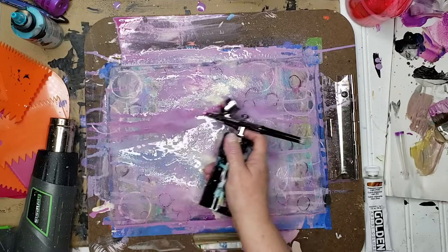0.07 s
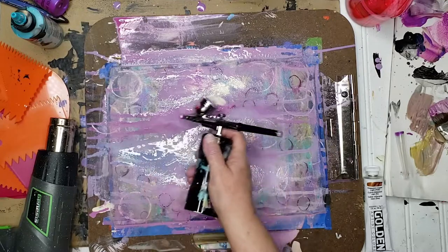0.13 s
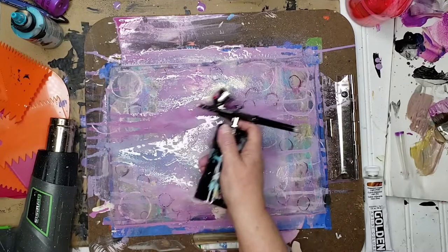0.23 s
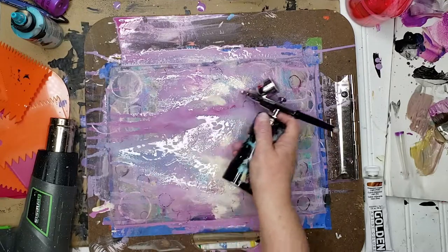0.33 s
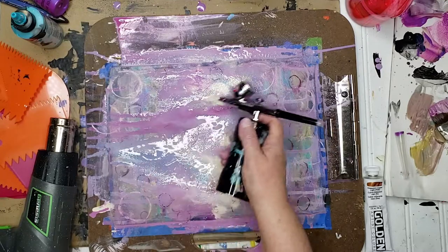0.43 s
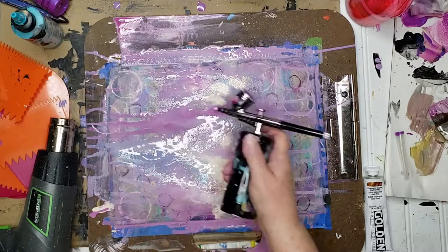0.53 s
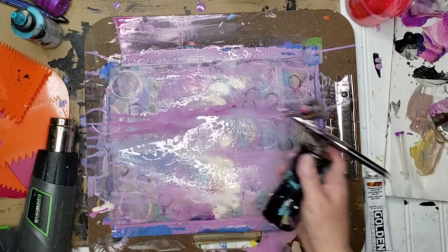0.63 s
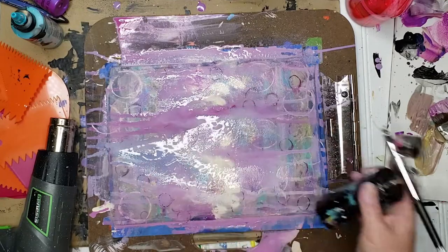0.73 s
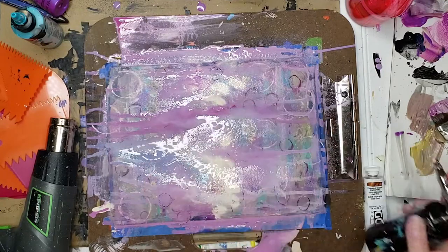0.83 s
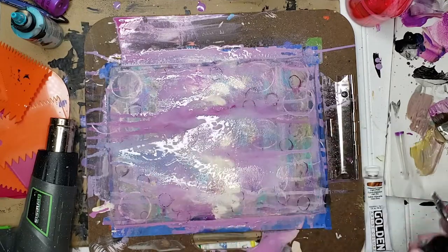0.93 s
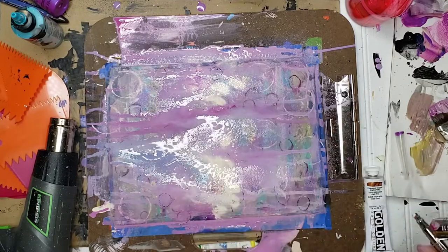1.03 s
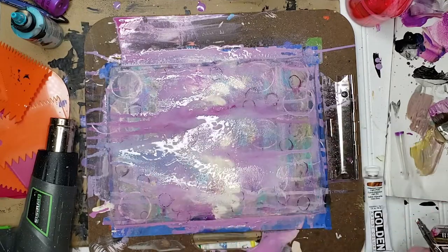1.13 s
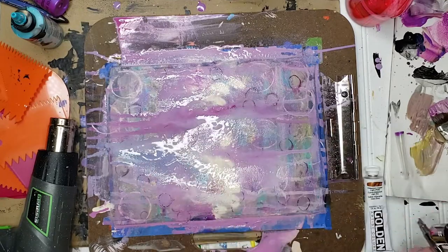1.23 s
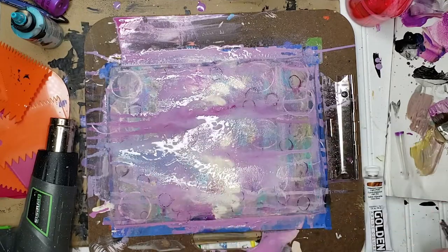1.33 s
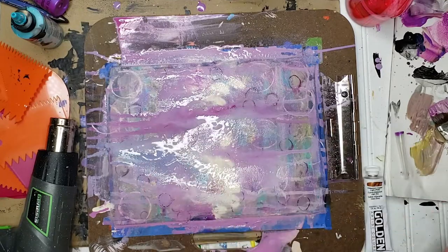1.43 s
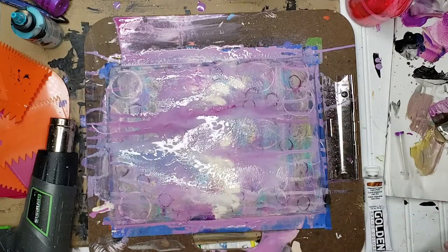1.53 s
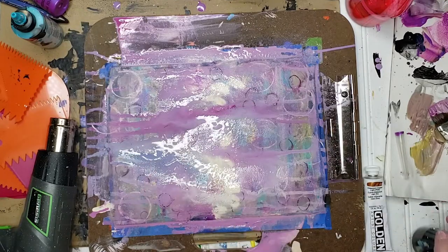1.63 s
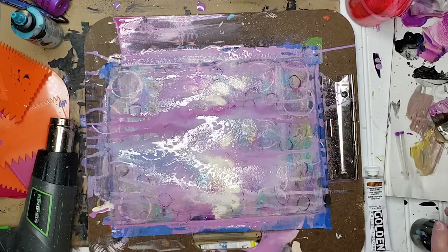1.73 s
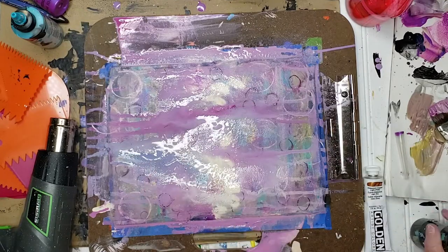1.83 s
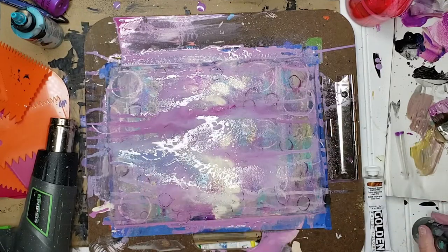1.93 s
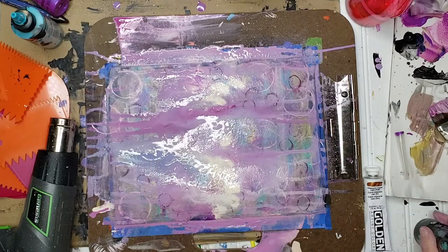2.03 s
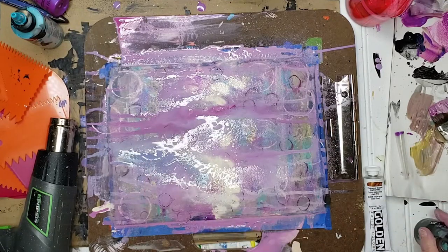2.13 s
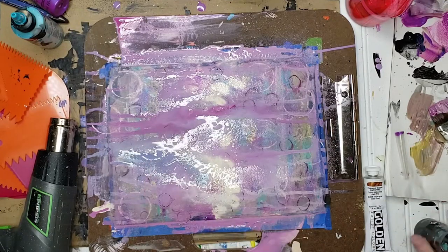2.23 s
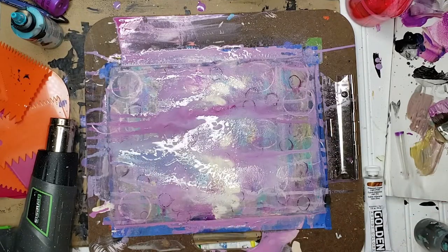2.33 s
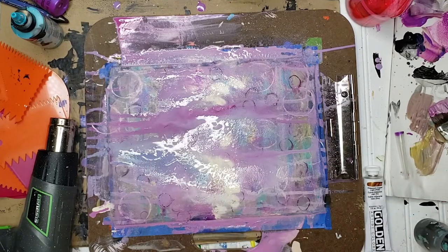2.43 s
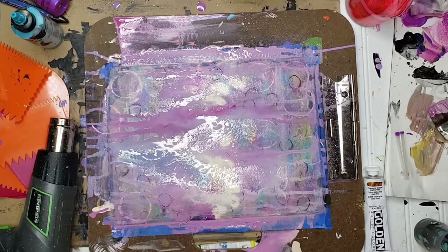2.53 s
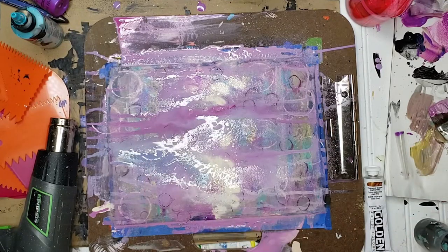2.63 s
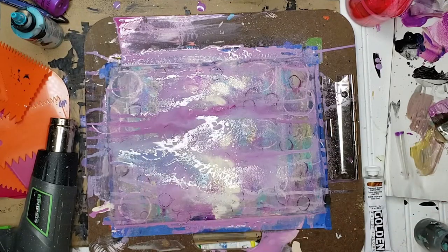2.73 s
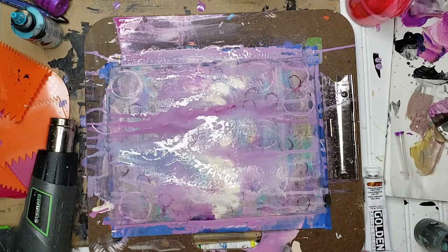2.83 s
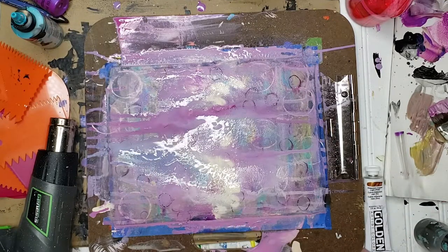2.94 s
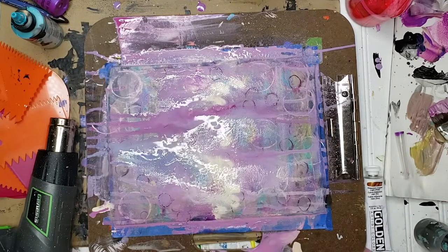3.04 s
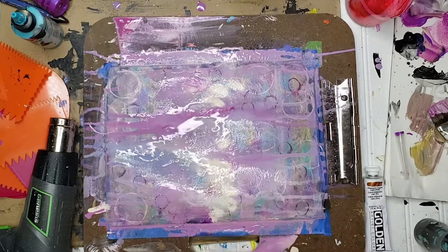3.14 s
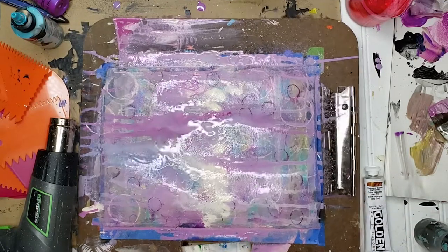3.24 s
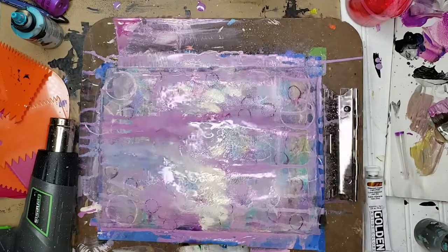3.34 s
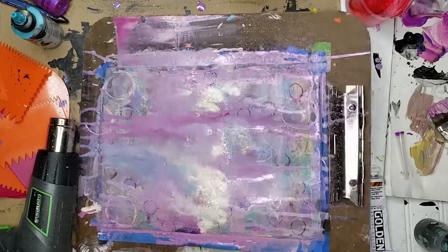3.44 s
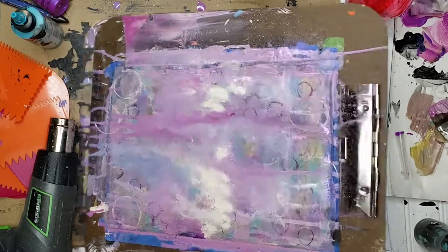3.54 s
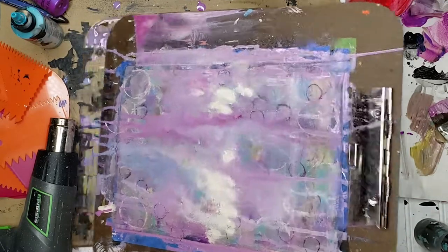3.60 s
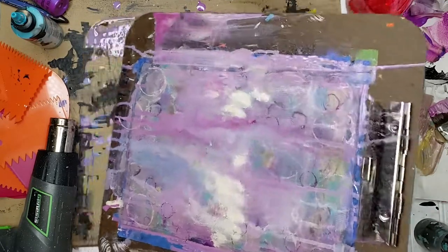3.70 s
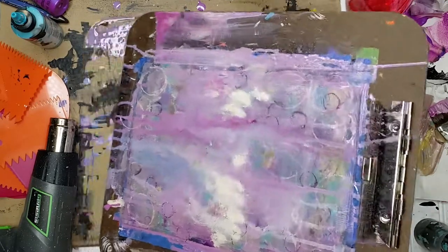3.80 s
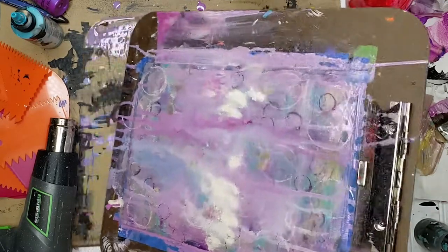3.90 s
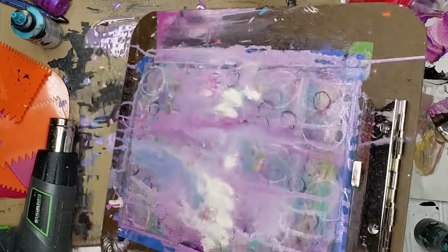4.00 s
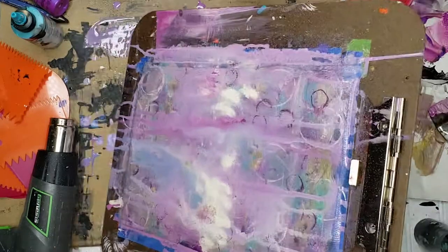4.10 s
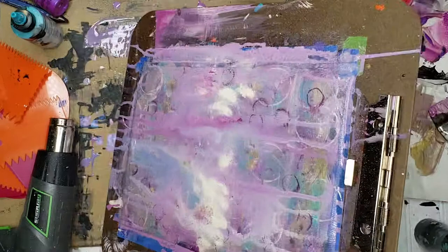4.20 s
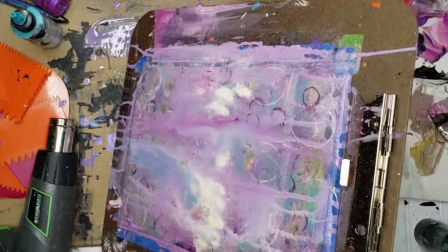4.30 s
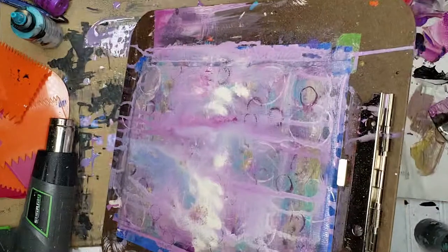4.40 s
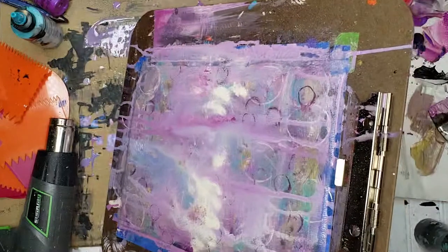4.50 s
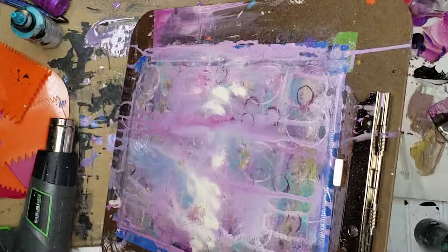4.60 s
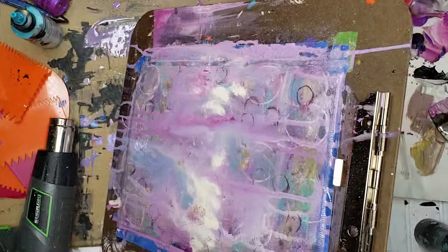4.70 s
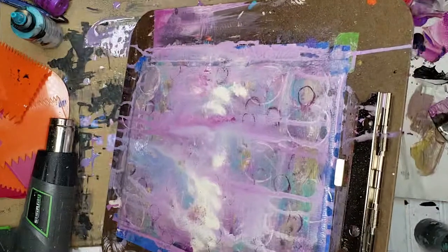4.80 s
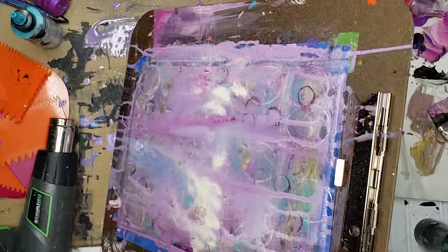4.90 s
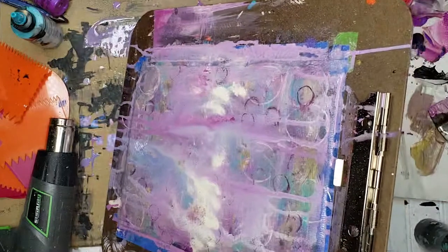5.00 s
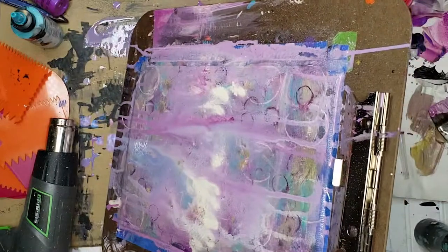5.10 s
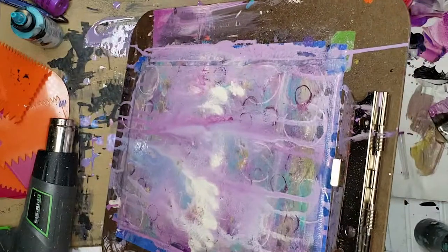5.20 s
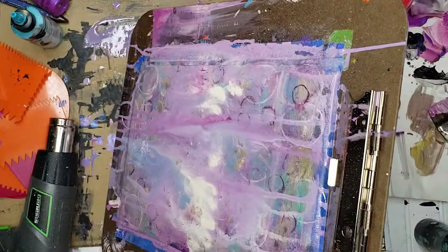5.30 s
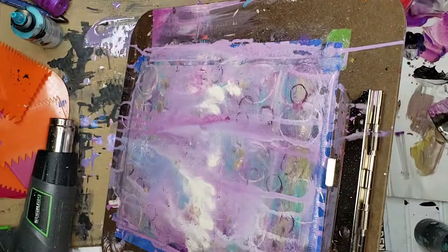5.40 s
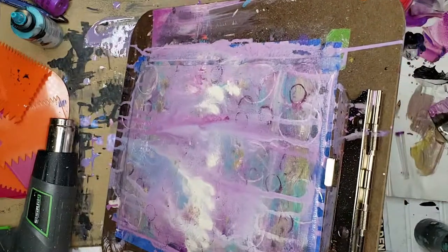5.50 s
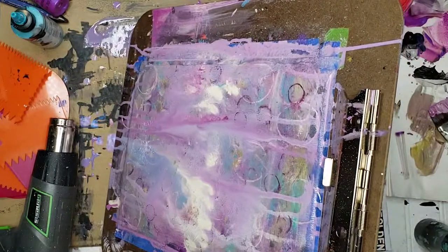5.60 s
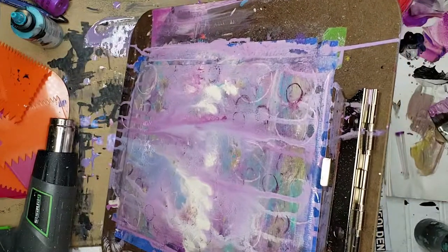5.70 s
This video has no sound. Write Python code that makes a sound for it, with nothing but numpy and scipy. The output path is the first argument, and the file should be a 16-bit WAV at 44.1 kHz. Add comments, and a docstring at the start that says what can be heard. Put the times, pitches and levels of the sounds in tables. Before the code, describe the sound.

A cordless airbrush blows a bright, steady hiss from the start, with the small buzz of its pump underneath. At about 0.7 seconds the air flutters briefly, and the tone shifts as the tool swings aside. Near 1.4 seconds the hiss and buzz stop with a click and a tiny puff, and a switch snaps off sharply just before 1.6 seconds. At about 1.7 seconds the tool lands on the table with a hard knock, then settles with softer bumps. Between 2 and 3.3 seconds a hand brushes faintly over things and small parts tick. A clipboard scrapes briefly across the table around 3.5 seconds, with a faint nudge and tick near 4 seconds and one more tiny tick near the end. Low ventilation rumbles throughout in the small room. The sounds are close and lean to the left.

```python
"""A bright hiss and a small buzz: a cordless airbrush blows over wet paint as its piston pump runs.
It swings aside, the trigger lets go, the valve spits its last air and the switch snaps off.
The tool lands with a hard knock that rings the work table, a hand brushes over things, small parts
tick and a clipboard scrapes across the table. Ventilation rumbles low in the small room throughout,
and the whole scene leans toward the left microphone port."""
import sys
import numpy as np
from scipy import signal
from scipy.fft import rfft, irfft, next_fast_len
from scipy.io import wavfile
from scipy.ndimage import map_coordinates

SR = 44100
rng = np.random.default_rng(int(sys.argv[2]) if len(sys.argv) > 2 else 0)


def transcribe(u):
    """Save the signal u as a 16-bit wav file named by the first command-line argument.

    u: samples, shape (n,) or (channels, n), limited to [-1, 1]; the rate is SR.
    q: integer samples, one column per channel.
    """
    v = np.clip(np.atleast_2d(u).T, -1, 1)
    q = np.round(v * 32767).astype(np.int16)
    wavfile.write(sys.argv[1], SR, q)


N = 253575

# Stereo width of close sounds, then of the room. Each row: frequency in Hz, left-right likeness.
CLOSE_LIKENESS = [(60, 1), (240, 0.27), (950, 0.61), (3770, -0.86), (15000, 0.09)]
ROOM_LIKENESS = [(60, 1), (220, 1), (400, 0.52), (730, 0.58), (1100, 0.016), (15000, .02)]
# The room's tail. Each row: frequency in Hz, time to fall 60 dB in seconds.
ROOM_DECAY = [(100, 0.22), (600, 0.23), (2000, 0.22), (7000, 0.23), (15000, 0.12)]
# Colour of the hiss over the paper, then turned aside. Each row: frequency in Hz, relative level in dB.
HISS_OVER_PAPER = [(1350, -63), (2300, -41.5), (2390, -22.5), (3100, -27.5), (3470, -24), (4560, -20.5),
                   (4870, -14), (5720, -14.5), (6560, -9), (9430, -7), (11600, 0), (12500, -2), (15200, 4),
                   (15800, -10)]
HISS_ASIDE = [(1350, -69.5), (2300, -35), (2880, -25), (2980, -33.5), (3120, -18), (3550, -24),
              (4080, -20.5), (4530, -44), (4870, -15), (5450, -15.5), (9430, -10), (12000, 0),
              (13100, -2.5), (15200, 6.5), (15800, -4)]
# The tool's body shades the right port. Each row: frequency in Hz, left over right in dB.
BODY_SHADE = [(2300, -5), (3500, 13), (4900, -0.5), (6000, 8.5), (9000, -1.5), (15000, -1)]
# Reflections off table, arm and jars. Each row: lag in seconds, gain.
NEAR_REFLECTIONS = [(.00062, .25), (.0023, .3), (.0052, .3)]
# Pump overtones over the paper, then turned aside. Each row: frequency in Hz, relative level in dB.
BUZZ_OVER_PAPER = [(310, -56), (540, -58), (700, -64.5), (850, -63.5), (1080, -80), (1250, -83),
                   (1545, -64.5), (1700, -57.5), (1780, -63), (1930, -60), (2200, -86.5), (3500, -76)]
BUZZ_ASIDE = [(310, -50), (540, -73), (700, -61.5), (850, -75.5), (926, -54), (1000, -68.5), (1235, -70.5),
              (1313, -62), (1400, -76.5), (1750, -87.5), (2400, -86), (2930, -93), (3090, -63.5),
              (3600, -140)]
# Where pump, room tone and table sit in stereo. Each row: frequency in Hz, left over right in dB.
PUMP_BALANCE = [(300, 4), (600, 12), (950, 13), (1700, 20.5), (3100, 11)]
ROOM_BALANCE = [(60, 11), (220, 5.5), (900, 8), (2500, 4.5), (15000, 0.5)]
TABLE_BALANCE = [(130, 5.5), (500, 6), (1100, 9.5), (2000, 11), (5000, 13.5), (14000, 2)]
# Noise colours. Each row: frequency in Hz, relative level in dB.
RUMBLE_COLOUR = [(15, -56.5), (25, -17), (58, -17.5), (139, -0.5), (195, -16), (236, -3.5), (345, -13.5),
                 (380, -13), (408, -26), (482, -19), (598, -33), (741, -27.5), (875, -33), (7500, -61.5),
                 (9750, -94), (16500, -120)]  # ventilation
MIC_COLOUR = [(3000, -6), (8500, -11), (10000, -6), (12000, -0.5), (15600, 0.5), (16000, -14.5)]  # the microphone's own hiss
SPUTTER_COLOUR = [(300, -18), (600, 4.5), (1100, -9.5), (1600, 2), (2050, 3), (2500, -8.5), (4000, -13),
                  (7000, -12)]  # air on the board's edge
CLICK_COLOUR = [(2000, 2.5), (3200, -6.5), (4800, -14), (6400, -1.5), (7600, -4.5), (8800, -9), (11000, 1),
                (15000, -0.5)]  # small hard parts
CRACK_COLOUR = [(60, -21), (150, 1.5), (350, -0.5), (700, -4), (1200, -7), (2000, -12), (2600, -17.5),
                (4500, -26.5), (7300, -25.5), (8600, -32.5), (15800, -24)]  # the attack of a knock
SKIN_COLOUR = [(2000, -21), (4300, -13), (5300, -5.5), (7400, 1.5), (8500, -9), (11000, 0), (14000, -0.5),
               (15800, 2.5)]  # a brushing hand
SCRAPE_COLOUR = [(90, 1), (150, -7), (280, -14), (400, -1.5), (560, -12), (720, -16.5), (1100, -15.5),
                 (1500, -35), (1900, -15), (2400, -19.5), (3200, -20.5), (4500, -23.5), (7200, -17),
                 (8400, -21.5), (15500, -23.5)]  # sliding hardboard
# Resonances that colour noise. Each row: centre in Hz, width in Hz, relative level in dB.
DUCT_MODES = [(65, 12.5, 1.5), (116.5, 5.1, -4), (135.1, 12.3, -4.5), (165.6, 16, -1), (230.3, 27, -1),
              (292.6, 22, -4.5), (313, 23.4, -0.5), (379.7, 6.5, -5), (472.7, 66, -14.5), (536, 29, -14),
              (727.1, 7.1, -10)]  # ventilation duct
VALVE_MODES = [(3300, 750, -1), (4260, 500, -1), (6450, 480, -4.5), (7100, 460, -7)]  # air valve
METAL_MODES = [(2370, 130, 3), (2900, 93, -0.5), (3730, 490, -1.5), (4480, 360, -3.5)]  # small metal parts
HARDBOARD_MODES = [(719, 34, 5), (1260, 41, -2), (1543, 79, 1), (2300, 96, 1.5), (2810, 230, -1),
                   (3257, 23, -2.5), (3590, 30, -11)]  # the clipboard's panel
STEEL_MODES = [(1340, 160, 5), (1820, 160, -1), (2280, 130, 0), (2780, 260, -13), (3350, 300, -17)]  # its steel clip
# The trigger, then the switch. Each row: start in seconds, snap level in dB, snap low cut in Hz,
# ring level in dB, ring low cut in Hz, the snap's left over right in dB.
CONTROL_SNAPS = [(1.3820, -9, 4540, -41, 3600, 6), (1.5600, 1, 12160, -18, 5260, 6)]
# Blows on the table. Each row: start in seconds, ring level in dB, crack level in dB,
# high cut in Hz, attack in seconds.
TABLE_BLOWS = [(1.7314, -11, -4.5, 9350, 0.00091), (1.7357, -23, -8, 9100, 0.00026),
               (1.7401, -9.5, -12.5, 9100, 0.00055), (1.753, -31.5, -27, 5000, 0.00048),
               (1.982, -34, -30, 710, .0015), (1.99, -23, -27, 503, 0.00067), (2.008, -34, -32, 600, .003),
               (2.032, -35, -27, 560, 0.005), (2.266, -42, -31.5, 1890, 0.0041),
               (2.31, -35, -33, 1580, 0.0045), (2.708, -35, -37, 660, 0.0007)]
# The table's ring. Each row: frequency in Hz, relative level in dB, time to fall 60 dB in seconds.
TABLE_MODES = [(54.4, -10, 0.24), (140.3, 7.5, 0.079), (170, -5, 0.09), (219.6, -5.5, 0.13),
               (334, -1, 0.11), (387, 0, 0.045), (486, -22, 0.048), (511, -14, 0.069), (530, -11, .07),
               (746, -6.5, 0.15), (860, -24, 0.052), (1031, -20, 0.065), (1070, -27, .06),
               (1230, -15.5, 0.072), (1360, -18.5, .08), (1570, -20.5, 0.16), (1820, -14, 0.13),
               (1940, -16.5, 0.14), (2440, -36, .09)]
# Hand strokes. Each row: peak time in seconds, level in dB, rise in dB per second, tilt in dB per octave.
HAND_STROKES = [(1.95, -38.5, 114, 0), (2.282, -47.5, 151, -1.5), (3.244, -45.5, 78, 2.5)]
# Handling ticks. Each row: start in seconds, level in dB, high cut in Hz, time to fall 60 dB in seconds.
HANDLING_TICKS = [(2.268, -36.5, 6000, 0.042), (2.706, -38.5, 8000, 0.029), (2.802, -36.5, 10100, 0.086),
                  (2.823, -39.5, 10100, .08), (2.946, -42.5, 5900, 0.025), (3.021, -36, 13800, 0.017),
                  (3.059, -32, 7000, 0.025), (3.109, -37.5, 10000, 0.025), (3.768, -47, 7000, .02),
                  (4.019, -40, 14000, 0.01), (5.367, -48.5, 11000, 0.016)]
# The clipboard is gripped, dragged and nudged straight. Each row: start in seconds, hold in seconds,
# board level in dB, steel level in dB.
CLIPBOARD_MOVES = [(3.054, 0.28, -65, -65.5), (3.546, 0.18, -36, -51.5), (3.887, 0.094, -61, -60.5)]


def amp(db):
    """Decibels to gain."""
    return 10 ** (np.asarray(db) / 20)


def unit(x):
    """x at rms 1."""
    return x / np.sqrt(np.mean(x ** 2) + 1e-20)


def along(points, hz):
    """(Hz, value) points read on a log axis."""
    freqs, values = np.transpose(points)
    return np.interp(np.log(hz + 1), np.log(freqs + 1), values)


def wobble(rate):
    """A smooth random curve, rate knots a second."""
    return map_coordinates(rng.standard_normal(int(N * rate / SR) + 4), [np.arange(N) * rate / SR])


def swell(s, hold, rise, fall):
    """An envelope that reaches 1 at time s, holds, then dies; rise and fall are in dB per second."""
    t = np.arange(N) / SR
    return amp(-rise * np.maximum(s - t, 0) - fall * np.maximum(t - s - hold, 0))


def filtered(x, response):
    """x through a frequency response."""
    n = x.shape[-1]
    padded = next_fast_len(n + 8192)
    return irfft(rfft(x, padded) * response(np.fft.rfftfreq(padded, 1 / SR)), padded)[..., :n]


def shape(spectrum):
    """An EQ curve through (Hz, dB) points, rolling off below the first."""
    return lambda hz: amp(along(spectrum, hz)) * np.minimum(hz / spectrum[0][0], 1) ** 2


def resonances(modes):
    """An EQ curve of (Hz, width Hz, dB) peaks."""
    return lambda hz: np.sqrt(sum(amp(db) ** 2 / (1 + (2 * (hz - centre) / width) ** 2) ** 2
                                  for centre, width, db in modes))


def sides(pan_db):
    """Left and right gains for a level difference."""
    gains = amp(np.array([[.5], [-.5]]) * pan_db)
    return gains / gains.mean(axis=0)


def rush(colour, likeness=CLOSE_LIKENESS):
    """Coloured stereo noise with its mid at rms 1; less likeness makes it wider."""
    def mid_side(hz):
        angle = np.arccos(np.clip(along(likeness, hz), 0, 1)) / 2
        return colour(hz) * np.array([np.cos(angle), np.sin(angle)])
    mid, side = filtered(rng.standard_normal((2, N)), mid_side)
    return np.array([mid + side, mid - side]) / mid.std()


def add(track, s, sound):
    """Mix a sound into a track at time s."""
    part = track[..., round(s * SR):][..., :sound.shape[-1]]
    part += sound[..., :part.shape[-1]]


def swing(middle_s=0.91, length_s=0.74, before=0.19, after=0.9):
    """How far the tool is turned aside (0-1): one smooth move of the hand."""
    done = .5 + .5 * np.tanh(4 * (np.arange(N) / SR - middle_s) / length_s)
    return before + (after - before) * done


def jet(level_db=-33, aside_boost_db=2.1, flutter_db=.6, shut_s=1.36, fade_t60=0.24):
    """Air hisses from the nozzle, coloured by its aim; near echoes comb the hiss as the tool moves."""
    t, aside = np.arange(N) / SR, swing()
    air = np.sqrt(1 - aside) * rush(shape(HISS_OVER_PAPER)) + np.sqrt(aside) * rush(shape(HISS_ASIDE))
    air = filtered(air, lambda hz: sides(along(BODY_SHADE, hz)))
    echoes = np.zeros((2, N))
    for port in range(2):
        for lag, gain in NEAR_REFLECTIONS:
            sway_s = .00018 * aside + .00002 * wobble(3.6)
            echoes[port] += gain * np.interp(t - lag - sway_s, t, air[port])
    valve = swell(0, shut_s, rise=0, fall=60 / fade_t60)
    level = amp(level_db + aside_boost_db * aside + flutter_db * wobble(19.6))
    return (air + echoes) * valve * level * sides(pan_db=1.4 + 4 * aside)


def pump(stroke_hz=77.22, level_db=2, rough_db=-6, stop_s=1.357):
    """Piston strokes give overtones and puffs of noise; turning the tool changes which ones carry."""
    t, aside = np.arange(N) / SR, swing()
    dip_db = 5 * np.exp(-((t - 0.666) / 0.057) ** 2)  # the buzz dips briefly as the swing begins
    level = amp(level_db - dip_db) * swell(0, stop_s, rise=0, fall=226)
    phase = 2 * np.pi * np.cumsum(stroke_hz * (1 + 0.0011 * wobble(9.55))) / SR
    buzz = np.zeros(N)
    for k in range(4, 47):
        over = amp(along(BUZZ_OVER_PAPER, k * stroke_hz))
        turned = amp(along(BUZZ_ASIDE, k * stroke_hz))
        overtone = np.sqrt(2) * np.sin(k * phase + rng.uniform(0, 2 * np.pi))
        buzz += (over + (turned - over) * aside) * overtone
    breath = sum(share * rush(shape(tones)) * np.linalg.norm(amp(np.array(tones)[:, 1]))
                 for share, tones in [(1 - aside, BUZZ_OVER_PAPER), (aside, BUZZ_ASIDE)])
    puffs = amp(rough_db) * breath * (1 + np.cos(phase))
    return filtered(level * (buzz + puffs), lambda hz: sides(along(PUMP_BALANCE, hz)))


def ventilation(rumble_db=-40, duct_db=-42, waver_db=1.7, hiss_db=-67):
    """A bed of low rumble and wavering duct resonances, with the microphone's faint hiss on top."""
    rumble = amp(rumble_db) * rush(shape(RUMBLE_COLOUR), ROOM_LIKENESS)
    duct = amp(duct_db + waver_db * wobble(5.29)) * rush(resonances(DUCT_MODES), ROOM_LIKENESS)
    hiss = amp(hiss_db) * rush(shape(MIC_COLOUR), ROOM_LIKENESS)
    return filtered(rumble + duct + hiss, lambda hz: sides(along(ROOM_BALANCE, hz)))


def sputter(start_s=0.6825, level_db=-38.5):
    """A short flutter as the jet sweeps over the board's edge."""
    level = amp(level_db + 2.2 * wobble(88.3)) * swell(start_s, hold=0.032, rise=919, fall=265)
    return level * rush(shape(SPUTTER_COLOUR)) * sides(pan_db=9)


def valve_puff(level_db=-38):
    """Trapped air rings the valve as it closes."""
    release_s = CONTROL_SNAPS[0][0]
    level = amp(level_db) * swell(release_s, hold=0, rise=5000, fall=338)
    return level * rush(resonances(VALVE_MODES)) * sides(pan_db=10)


def click(low_hz, bright_hz, t60, wet_db=-5):
    """A small hard part gives a dying burst of noise and lights up the room."""
    def band(hz):
        low_cut = (hz / low_hz) ** 4 / np.hypot(1, (hz / low_hz) ** 4)
        return amp(along(CLICK_COLOUR, hz)) * low_cut / np.hypot(1, (hz / bright_hz) ** 3)
    t = np.arange(SR // 2) / SR
    snap = rng.standard_normal((2, len(t))) * amp(-60 * t / t60)
    return filtered(snap + amp(wet_db) * np.linalg.norm(snap[0]) * room_tail(), band)


def room_tail(build_s=0.006):
    """The walls answer a click with a short tail, centred in the bass and wide in the treble."""
    n = SR // 2
    hz, t, noise = signal.stft(rng.standard_normal((2, n)), SR, nperseg=256)
    alike = np.clip(along(ROOM_LIKENESS, hz), 0, 1)[:, None]
    noise[1] = alike * noise[0] + np.sqrt(1 - alike ** 2) * noise[1]
    decay = amp(-60 * t / along(ROOM_DECAY, hz)[:, None])
    tail = signal.istft(noise * decay, SR, nperseg=256)[1][:, :n]
    tail *= 1 - np.exp(-np.arange(n) / SR / build_s)
    return tail / np.linalg.norm(tail[0])


def trigger_and_switch():
    """The trigger springs back, then the switch snaps off; each rings on briefly."""
    out = np.zeros((2, N))
    for s, snap_db, snap_hz, ring_db, ring_hz, pan_db in CONTROL_SNAPS:
        add(out, s, amp(snap_db) * click(snap_hz, bright_hz=17900, t60=0.011) * sides(pan_db))
        add(out, s, amp(ring_db) * click(ring_hz, bright_hz=7100, t60=.14))
    return out


def knocks(crack_t60=0.11, wet_db=-11):
    """The tool's base lands, rocks and settles; softer contacts ring mostly the table's low modes."""
    out, t = np.zeros((2, N)), np.arange(SR // 2) / SR
    for s, ring_db, crack_db, bright_hz, attack_s in TABLE_BLOWS:
        contact = lambda hz: 1 / np.hypot(1, (hz / bright_hz) ** 2)
        ring = np.zeros(len(t))
        for k, (hz, db, t60) in enumerate(TABLE_MODES):
            decay = amp(db + rng.normal(0, 1) - 60 * t / t60)
            ring += (-1) ** k * contact(hz) * decay * np.sin(2 * np.pi * hz * t)
        crack = filtered(rng.standard_normal(len(t)), lambda hz: shape(CRACK_COLOUR)(hz) * contact(hz))
        blow = amp(ring_db) * ring + amp(crack_db - 60 * t / crack_t60) * unit(crack)
        blow *= 1 - np.exp(-t / attack_s)
        add(out, s, blow)
        add(out, s, amp(wet_db) * signal.fftconvolve(blow[None], room_tail(), axes=1))
    return filtered(out, table_to_ports)


def table_to_ports(hz, lead_s=0.000196):
    """Sound from the table reaches the left port louder and earlier."""
    return sides(along(TABLE_BALANCE, hz)) * np.exp(1j * np.pi * hz * lead_s * np.array([[1], [-1]]))


def hand():
    """Skin whispers over tool and paper, swelling as it speeds up and dying as it lifts off."""
    strokes = np.zeros((2, N))
    for s, db, rise, tilt_db in HAND_STROKES:
        skin = rush(lambda hz: shape(SKIN_COLOUR)(hz) * amp(tilt_db * np.log2(1 + hz)))
        strokes += amp(db) * swell(s, hold=0, rise=rise, fall=191) * skin
    grain = amp(1.1 * wobble(93))
    return strokes * grain * sides(pan_db=9.5)


def ticks(low_hz=2120, metal_db=-26.5):
    """Handled things tick, and each tick rings small metal parts."""
    out, ringing = np.zeros((2, N)), np.zeros(N)
    for s, db, bright_hz, t60 in HANDLING_TICKS:
        add(out, s, amp(db) * click(low_hz, bright_hz, t60))
        ringing += amp(db + metal_db) * swell(s, hold=0, rise=9000, fall=251)
    return (out + ringing * rush(resonances(METAL_MODES))) * sides(pan_db=8.5)


def clipboard(wood_db=-7):
    """The hardboard catches and slips on the gritty table, which rings the board and its steel clip."""
    grit = unit(amp(1.4 * wobble(45) + 1.3 * wobble(700)))
    scrape = rush(shape(SCRAPE_COLOUR))
    wood = amp(wood_db) * rubbed(HARDBOARD_MODES, shift_db=1.5)
    board = grit * (scrape + wood) * sides(pan_db=7.5)
    steel = rubbed(STEEL_MODES, shift_db=-1) * sides(pan_db=11.5)
    return sum(swell(s, hold, rise=262, fall=215) * (amp(board_db) * board + amp(steel_db) * steel)
               for s, hold, board_db, steel_db in CLIPBOARD_MOVES)


def rubbed(modes, shift_db):
    """The contact keeps shifting, so each mode swells on its own."""
    return unit(sum(amp(db + shift_db * wobble(30)) * rush(resonances([(hz, width, 0)]))
                    for hz, width, db in modes))


def scene():
    """The full mix at the two microphone ports."""
    return (jet() + pump() + ventilation() + sputter() + valve_puff() + trigger_and_switch()
            + knocks() + hand() + ticks() + clipboard())


def record(dry):
    """The microphone sheds the deepest bass and the highest treble; peaks past full scale overload."""
    top_hz, low_cut_hz = 15980, 34
    band_limit = lambda hz: 1 / np.hypot(1, (hz / top_hz) ** 150)
    low_cut = signal.butter(2, low_cut_hz, "highpass", fs=SR, output="sos")
    heard = signal.sosfilt(low_cut, filtered(dry, band_limit))
    return filtered(np.clip(heard, -1, 1), band_limit)


dry = scene()
out = record(dry)
transcribe(out)
```